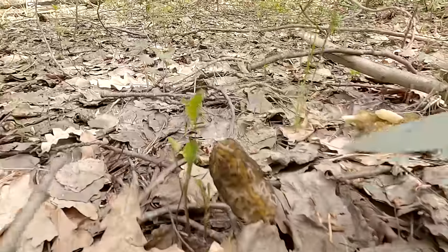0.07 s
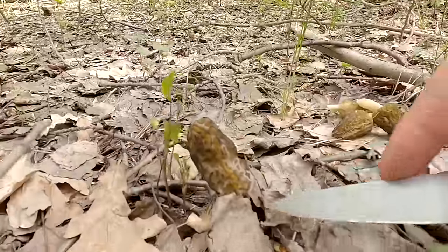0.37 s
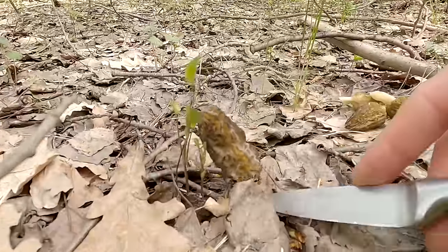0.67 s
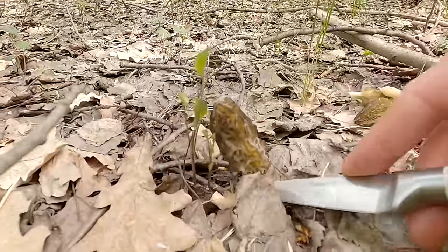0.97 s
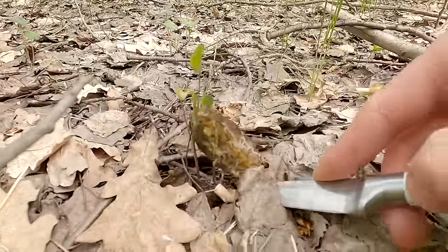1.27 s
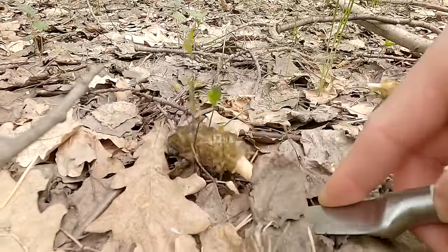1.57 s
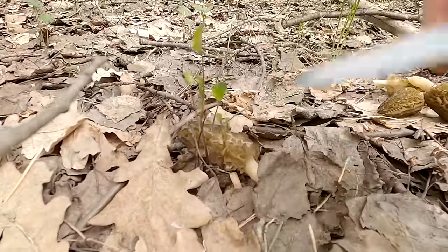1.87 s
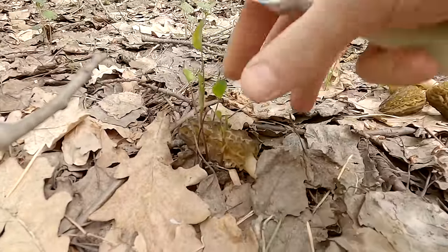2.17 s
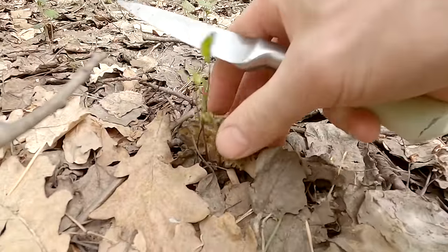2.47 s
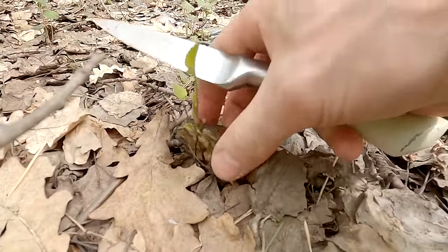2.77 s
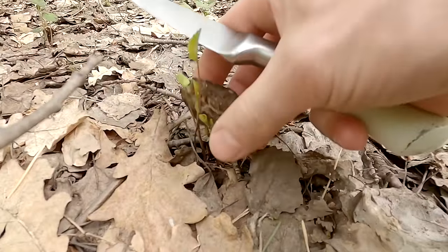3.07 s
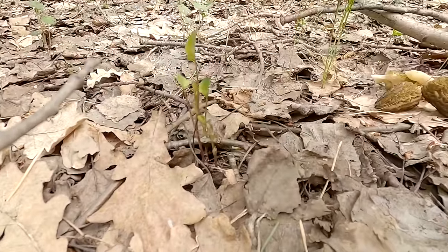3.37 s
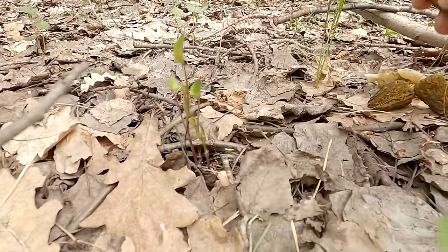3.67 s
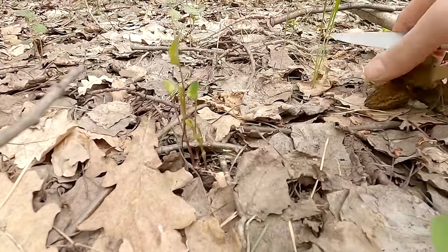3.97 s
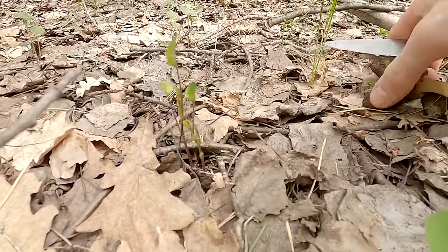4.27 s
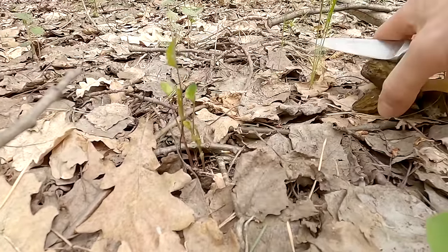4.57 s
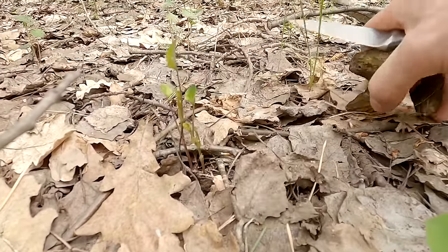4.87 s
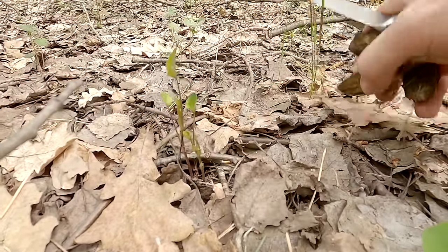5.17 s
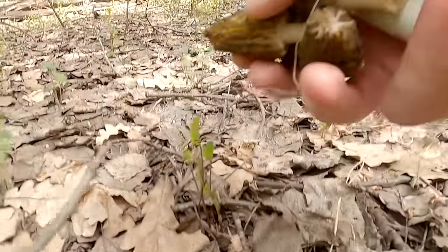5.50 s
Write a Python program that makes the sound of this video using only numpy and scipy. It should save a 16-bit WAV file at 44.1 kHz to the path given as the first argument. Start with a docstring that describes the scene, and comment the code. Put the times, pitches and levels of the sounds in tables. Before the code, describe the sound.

Dry fallen leaves crackle and slide under a hand and knife, close to the microphone. The bursts build to a few sharp cracks, dull knocks and a faint steel ring as the blade cuts through a mushroom stem. After a short lull, lighter rustles and snaps come and go while the hand collects mushrooms, ending in a very brief squeak. Faint handling rumble and a soft forest hush continue throughout.

```python
"""On a forest floor, close by, a hand with a small knife cuts a mushroom out of dry leaves and gathers it.
The leaves rustle as swarms of tiny fractures, with louder single cracks among them. Stem, soil and
mushrooms give dull knocks, and the blade rings faintly as it flicks free. Something squeaks briefly at
the end. Under it all lie the rumble of a hand-held camera and a quiet forest."""
import sys
import numpy as np
from scipy import signal
from scipy.fft import rfft, irfft
from scipy.io import wavfile
from scipy.ndimage import uniform_filter1d

SR = 44100
rng = np.random.default_rng(int(sys.argv[2]) if len(sys.argv) > 2 else 0)


def to_wav(sig):
    """Store sig (one row per channel, or 1-D mono) as 16-bit WAV at the path in sys.argv[1].

    Samples outside -1..1 are clipped; the rate is SR.
    """
    pcm = np.clip(np.atleast_2d(sig), -1, 1) * 32767
    pcm = np.round(pcm).astype(np.int16)
    wavfile.write(sys.argv[1], SR, pcm.T)  # frames by channels


N = 253134
TIME = np.arange(N) / SR
HZ = np.fft.rfftfreq(N, 1 / SR)
TYPICAL_CRACK_HZ, TYPICAL_CRACK_S = 3100, .0013

# The tone colour of dry leaves: pitch_hz, level_db
LEAF_SPECTRUM = [(40, -17.5), (130, -3), (280, -5.5), (420, -6), (900, -2.5), (1900, 0), (3200, 0.5),
                 (4800, -3), (6500, -5), (7900, -10.5), (9000, -7), (10500, -17), (13000, -23),
                 (15500, -36)]


def stirring():
    """Hand and knife push into the leaves: gives level_db, weight_db, crisp_db and sliding over time."""
    # Deep pushes add weight (lows); thin dry edges add crispness (highs):
    # start_s, hold_s, level_db, fall_db_per_s, weight_db, crisp_db, sliding_share
    pushes = [(-0.01, 0.19, -44, 150, 6, -1, .5), (0.194, 0.14, -38, 130, 2.5, -2, 0.37),
              (0.406, 0.074, -41.5, 154.5, 3.5, -4.5, 0.22), (0.581, 0.11, -50, 98, 1, -6, 0.54),
              (0.678, 0.039, -44, 113, 6.5, -4, 0.76), (0.808, .13, -55, 100, 3, -8, 0.15),
              (0.954, 0.12, -49.5, 100, 2.5, 0, .3), (1.061, 0.042, -40.5, 137, 4.5, -3, .3),
              (1.201, 0.098, -43, 244, 3.5, -2, 0.3), (1.34, 0.054, -59.5, 200, 4, -5, 0.3),
              (1.439, 0.091, -42, 296, -1.5, -0.5, 0.33), (1.573, 0.083, -31, 170, 2, 0.5, 0.29),
              (1.779, 0.056, -40.5, 169.5, 4.5, 5, 0.65), (1.892, 0.044, -29.5, 273, 3.5, 1, 0.46),
              (2.033, .02, -59.5, 65, -17, -6, 0.13), (2.484, .03, -48.5, 136, -3, 3, 0.13),
              (2.598, .11, -51, 118, -6, -0.5, 0.24), (2.741, 0.096, -49.5, 120, 3.5, 0.5, 0),
              (2.908, 0.1, -48, 102, 3.5, 3, .15), (3.079, 0.037, -48.5, 105, -1, 4.5, 0.2),
              (3.135, 0.058, -46.5, 550, 6, 0.5, 0.37), (3.225, .03, -62, 50, 5, -16, .35),
              (3.685, 0.15, -67.5, 54, -2, -10, 0.1), (4.112, 0.026, -64, 87, 14, 1, 0.15),
              (4.218, 0.024, -56, 140, 1, 1.5, 0.07), (4.346, 0.14, -54, 217, -0.5, 1.5, 0.23),
              (4.529, 0.13, -54.5, 348, -8, 0.5, .1), (4.711, 0.09, -53.5, 200, -3, 6, 0.2),
              (4.85, 0.12, -51.5, 300, 3.5, 2.5, 0.18), (5.046, 0.055, -54, 182, -5, 7, 0.4),
              (5.168, 0.11, -60, 100, -2, 9, 0.1), (5.329, 0.13, -60, 100, 2, -1, 0.5),
              (5.417, 0.054, -50.5, 102, -1, -1, 0.8), (5.474, .06, -45.5, 90, 5.5, -4.5, 0.92),
              (5.59, 0.093, -53.5, 100, -2, 6.5, 0.56)]
    resting_db = -73
    power, touch = np.full(N, amp(resting_db) ** 2), np.zeros((3, N))
    for start_s, hold_s, level_db, fall_db_per_s, *feel in pushes:
        press = swell(start_s, hold_s, attack_s=0.019, fall_db_per_s=fall_db_per_s)
        # The hand brushes the top leaves on its way in.
        brush = amp(-14 - 172 * abs(TIME - start_s)) * (TIME < start_s + hold_s)
        push_power = amp(level_db) ** 2 * (press ** 2 + brush ** 2)
        power += push_power
        touch += np.outer(feel, push_power)  # the strongest push counts most
    return 10 * np.log10(power), *(touch / power)


def rustle(stir_db, weight_db, crisp_db, sliding, low_hz=850, high_hz=5500):
    """Leaves crackle and slide over each other; the touch sets their weight and crispness."""
    uneven_db = stir_db + wander(25)
    sliding = np.clip(sliding, 0, 1)
    crackle = np.sqrt(1 - sliding) * fracture_swarm()
    slide = np.sqrt(sliding) * noise(LEAF_SPECTRUM)
    both = rfft(crackle + slide)
    lows = 1 / (1 + (HZ / low_hz) ** 4)
    highs = 1 - 1 / (1 + (HZ / high_hz) ** 4)
    bands = ((lows, weight_db), (1 - lows - highs, 0), (highs, crisp_db))
    return sum(amp(uneven_db + lift_db) * irfft(both * band, N) for band, lift_db in bands)


def fracture(ring_hz, ring_share=0.36):
    """One tiny break: a snap, and the short ring of the piece of leaf that it frees."""
    t = np.arange(325) / SR
    snap_s = 0.0003 * rng.uniform(0.45, 1.97)
    snap = rng.standard_normal(len(t)) * np.exp(-t / snap_s)
    ring_cycles = rng.uniform(0.53, 1.47)
    ring = np.sin(2 * np.pi * ring_hz * t) * np.exp(-t * ring_hz / ring_cycles)
    return unit(snap) + ring_share * unit(ring)


def fracture_swarm(per_s=2600, spread_db=3.0, clump_db=2.5, pitches=36):
    """A crackle of steady average level; the breaks come in clumps and a few are much larger."""
    sizes_db = spread_db * rng.exponential(1, N) + clump_db * wander(92)
    sizes = amp(np.minimum(sizes_db, 14))
    clicks = sizes * rng.choice([-1, 1], N) * (rng.random(N) < per_s / SR)
    piece = rng.integers(0, pitches, N)
    swarm = sum(signal.oaconvolve(clicks * (piece == k), fracture(ring_hz))[:N]
                for k, ring_hz in enumerate(np.linspace(600, 12000, pitches)))
    swarm = colour(swarm, LEAF_SPECTRUM)
    power = uniform_filter1d(uniform_filter1d(swarm ** 2, 1300), 650)
    return swarm / np.sqrt(abs(power) + 1e-12)


def leaf_resonances(sound, patchy_db=2.0, patch_hz=650, patch_s=0.039, size=512):
    """Leaf after leaf comes under the fingers, and each favours its own pitches in the rustle."""
    # Bands of the rustle also swell or dip: brief resonances, and slow shifts in treble brightness:
    # middle_s, half_length_s, pitch_hz, width_hz, lift_db
    band_swells = [(0.285, .1, 4340, 700, 3.5), (.35, 0.5, 6500, 1600, -8), (.45, 0.82, 12100, 3020, 4.5),
                   (1.825, 0.032, 2430, 500, 5.5), (1.826, 0.065, 3220, 500, 3.5),
                   (2.66, 0.057, 2560, 500, 7.5), (2.673, 0.08, 5300, 700, 4), (3.156, 0.049, 4250, 800, 6),
                   (4.534, 0.056, 5400, 895, 10.5), (4.7, 0.63, 11200, 2500, -7),
                   (4.9, 0.23, 7000, 2200, 5.5), (5.567, 0.15, 2740, 1100, 6)]
    hz, times, frames = signal.stft(sound, SR, nperseg=size, noverlap=size * 3 // 4)
    pitch_blur = np.exp(-(2 * (hz - hz[size // 4]) / patch_hz) ** 2)
    time_blur = np.exp(-(2 * (times[:size // 4] - times[size // 8]) / patch_s) ** 2)
    blur = np.outer(pitch_blur, time_blur)
    patches = unit(signal.fftconvolve(rng.standard_normal(frames.shape), blur, "same"))
    gain_db = patchy_db * (patches - patches[:size // 8].mean(0))
    for middle_s, half_s, pitch_hz, width_hz, lift_db in band_swells:
        during = np.exp(-((times - middle_s) / half_s) ** 4)
        gain_db += lift_db * during / (1 + (2 * (hz[:, None] - pitch_hz) / width_hz) ** 2)
    return signal.istft(frames * amp(gain_db), SR, nperseg=size, noverlap=size * 3 // 4)[1][:N]


def cracks(rows, ring_octaves=0.4, settle_db=-21, settle_s=.006):
    """Each crack is a quick tear that rings the broken piece, which then settles."""
    out, t = np.zeros(N), np.arange(2048) / SR
    hz = np.geomspace(40, 16000, num=120)
    decades = np.log10(np.maximum(hz, 700) / TYPICAL_CRACK_HZ)
    for start_s, level_db, brightness_hz, time_scale_s, ring_hz in rows:
        rise = 1 - np.exp(-t / (0.4 * time_scale_s))
        tear = rise * np.exp(-(t / (2.15 * time_scale_s)) ** 2)
        settle = amp(settle_db) * np.exp(-t / settle_s)
        tilt_db = 16.8 * np.log(brightness_hz / TYPICAL_CRACK_HZ) * decades  # small pieces are brighter
        peak_db = 10 - np.log2(time_scale_s / TYPICAL_CRACK_S)  # slow tears ring less
        ring_db = peak_db / (1 + (2 * np.log2(hz / ring_hz) / ring_octaves) ** 2)
        shape = np.transpose([hz, spectrum(LEAF_SPECTRUM, hz) + tilt_db + ring_db])
        burst = colour((tear + settle) * rng.standard_normal(len(t)), shape)
        strength = np.sqrt(np.sum(burst ** 2) / (0.0026 * SR))  # as if packed into 2.6 ms
        add(out, start_s, amp(level_db) * burst / strength)
    return out


def loud_cracks():
    """Single leaves and stalks break and stand out from the rustle."""
    # One break a row: start_s, level_db, brightness_hz, time_scale_s, ring_hz
    breaks = [(.2035, -33, 3000, .0012, 3600), (.262, -31.5, 2800, .0013, 2400),
              (.313, -37, 2800, 0.0003, 1400), (.319, -32.5, 3300, 0.0016, 4240),
              (.334, -43, 3300, .0004, 4320), (.3545, -33.5, 2090, 0.00028, 1960),
              (.4917, -40, 2300, 0.00094, 1910), (.5404, -51, 2700, 0.0019, 900),
              (.603, -42, 2700, 0.00072, 2120), (.7005, -40, 3500, 0.00048, 3400),
              (.763, -46, 2700, .0023, 2200), (.9935, -35, 2610, 0.0024, 1180),
              (1.0746, -33.5, 2540, .0002, 1970), (1.0813, -31.5, 3220, 0.001, 2620),
              (1.108, -37, 3100, 0.0013, 4280), (1.222, -38, 1980, .001, 890),
              (1.2347, -39.5, 2100, 0.0021, 1200), (1.3074, -35, 3000, 0.0011, 2650),
              (1.379, -49, 3900, 0.0017, 5140), (1.4536, -39, 7840, 0.00018, 10300),
              (1.5073, -32, 3600, .001, 6000), (1.552, -40, 2800, .0024, 2600),
              (1.5913, -25.5, 4200, 0.0012, 5940), (1.61, -38, 3600, .0035, 3300),
              (1.6494, -30, 3100, 0.003, 885), (1.687, -31.5, 3100, 0.0015, 2800),
              (1.7354, -35.5, 2980, 0.005, 3930), (1.766, -37.5, 4800, 0.0028, 3180),
              (1.9043, -23.5, 2300, 0.0029, 4050), (1.922, -20.5, 3680, 0.0032, 5700),
              (1.9695, -27.5, 3200, 0.00071, 3100), (2.195, -54, 2670, 0.00075, 2200),
              (2.5515, -43, 4700, 0.0021, 4530), (2.5786, -44, 4300, .0021, 10500),
              (2.6547, -37.5, 3500, 0.0041, 5140), (2.7976, -37, 3400, 0.002, 4840),
              (2.839, -37.5, 3200, 0.0029, 2020), (2.8756, -40, 4300, 0.0022, 5160),
              (2.9085, -39.5, 2230, 0.0028, 1210), (2.9363, -33.5, 2980, 0.0039, 1520),
              (2.9993, -38.5, 4200, 0.0011, 10120), (3.0163, -37.5, 2300, 0.0014, 1610),
              (3.0636, -29.5, 4150, 0.0015, 3960), (3.1183, -40.5, 5300, 0.0019, 8860),
              (3.1566, -36, 3300, .0016, 4830), (3.1618, -34, 3870, 0.00058, 4140),
              (3.2616, -49.5, 3920, 0.002, 4300), (3.5523, -53.5, 1600, 0.0023, 1000),
              (3.611, -52, 2400, 0.0011, 2000), (3.711, -49.5, 2100, 0.00061, 1600),
              (3.7835, -44, 3670, 0.0024, 4300), (4.1234, -55, 5300, 0.0013, 8900),
              (4.2492, -44.5, 3900, .0014, 6260), (4.264, -46, 3300, 0.0012, 2080),
              (4.292, -46.5, 2900, 0.0056, 4120), (4.572, -43.5, 3100, 0.0027, 3500),
              (4.6115, -44.5, 3500, .0028, 6700), (4.6552, -44, 3300, .0006, 3400),
              (4.7987, -37.5, 4040, 0.002, 3280), (4.8684, -37.5, 3630, 0.0039, 6060),
              (4.968, -39.5, 3100, 0.0022, 6400), (5.0695, -36, 3100, 0.0026, 1900),
              (5.4612, -37.5, 3300, .0003, 3430), (5.483, -42.5, 2620, 0.00061, 880)]
    return cracks(breaks)


def small_cracks(stir_db, per_s=19, max_db=-40.5, tries=300):
    """Little pieces give way by chance, louder where the leaves are stirred harder."""
    at, chance = rng.integers(0, N, tries), rng.random(tries)
    loudness, brightness, length, ring = np.clip(rng.standard_normal((tries, 4)), -2, 2).T
    level_db = np.minimum(stir_db[at] + 4 + 2.5 * loudness, max_db)
    brightness_hz = TYPICAL_CRACK_HZ * 2 ** (0.6 * brightness)
    time_scale_s = TYPICAL_CRACK_S * 2 ** (0.97 * length)
    ring_hz = TYPICAL_CRACK_HZ * 2 ** (0.8 * ring)
    rows = np.transpose([at / SR, level_db, brightness_hz, time_scale_s, ring_hz])
    return cracks(rows[chance < per_s * N / SR / tries])


def knocks(cycles_to_peak=0.78):
    """Soft, damp things swing only a few times when struck."""
    # Dull knocks into the stem, the soil and the mushrooms: start_s, level_db, pitch_hz
    hits = [(1.223, -34.5, 630), (1.612, -33, 686), (1.628, -35.5, 432), (1.651, -24.5, 526),
            (1.906, -29, 710), (1.922, -41, 115), (1.928, -37, 480), (2.776, -51, 550), (3.158, -45, 375),
            (3.9667, -42.5, 1430), (5.0708, -30, 1580), (5.481, -37.5, 540)]
    out, t = np.zeros(N), np.arange(2048) / SR
    for start_s, level_db, pitch_hz in hits:
        age = t * pitch_hz / cycles_to_peak
        add(out, start_s, amp(level_db) * age * np.exp(1 - age) * np.sin(2 * np.pi * pitch_hz * t))
    return out


def blade():
    """The thin steel rings on after each flick."""
    # The blade flicks free, then is brushed again: start_s, level_db, lift_per_higher_tone_db
    flicks = [(1.925, -37, -13), (2.112, -68, 1)]
    # The blade's own tones: pitch_hz, level_db, ring_s (time to fade by 60 dB)
    tones = [(3994, 0, .23), (4840, 0, .46), (8926, -24, .2)]
    out, t = np.zeros(N), np.arange(SR // 2) / SR
    for start_s, level_db, lift_db in flicks:
        for k, (pitch_hz, tone_db, ring_s) in enumerate(tones):
            fade = amp(level_db + tone_db + k * lift_db - 60 * t / ring_s)
            add(out, start_s, fade * np.sin(2 * np.pi * pitch_hz * t))
    return out


def squeak(level_db=-39.5, jitter=0.034, octave_db=-8):
    """Fast sticking and slipping: a rubbery rasp that briefly catches into a clean, lower tone."""
    # The rasp around the tone: pitch_hz, level_db
    rasp_spectrum = [(1000, -38), (2300, -15), (2700, 1), (3200, -6), (3700, -1), (4050, -8), (4600, -20),
                     (9000, -43)]
    catch = np.exp(-((TIME - 5.6815) / 0.0053) ** 2)
    pitch_hz = 2865 - 100 * catch
    rough = 0.98 * (1 - catch)
    phase = 2 * np.pi * np.cumsum(pitch_hz * (1 + jitter * wander(660))) / SR
    tone = (1 - rough) * unit(np.sin(phase))
    octave = amp(octave_db) * np.sqrt(rough) * unit(np.sin(2 * phase))
    rasp = rough * noise(rasp_spectrum)
    loudness = swell(start_s=5.661, hold_s=0.029, attack_s=.003, fall_db_per_s=600)
    return amp(level_db + 6.5 * catch) * loudness * (tone + octave + rasp)


def forest_echo(sound, scatter_db=-17, scatter_s=0.0014, trunks_db=-31, tail_s=0.26):
    """Fallen leaves scatter each sound for a few milliseconds; trunks send back a faint tail."""
    t = np.arange(SR // 2) / SR
    near = rng.standard_normal(len(t)) * np.exp(-t / scatter_s) * (t > .001)
    far = rng.standard_normal(len(t)) * amp(-60 * t / tail_s) * (t > .015)
    echo = amp(scatter_db) * near / np.linalg.norm(near) + amp(trunks_db) * far / np.linalg.norm(far)
    return sound + signal.fftconvolve(sound, echo)[:N]


def camera_rumble(swell_db=2.5):
    """The unsteady hand that holds the camera makes a low rumble."""
    # How hard the hand shakes: time_s, level_db
    shake = [(0.0, -54.5), (0.46, -51.5), (0.69, -59.5), (0.77, -48), (1.04, -62.5), (1.36, -56),
             (2.67, -62.5), (2.7, -55), (3.61, -68.5), (3.69, -51.5), (3.88, -69), (4.14, -53.5),
             (4.22, -66), (4.32, -53.5), (4.68, -63.5), (4.8, -51.5), (5.48, -58), (5.74, -45.5)]
    # The tone colour of the rumble: pitch_hz, level_db
    rumble_spectrum = [(10, -21), (22, 0), (34, 2), (43, -1), (55, -14.5), (90, -20.5), (200, -31.5),
                       (500, -64)]
    level_db = np.interp(TIME, *np.transpose(shake)) + swell_db * wander(14)
    rumble = noise(rumble_spectrum)
    return amp(level_db) * rumble / np.sqrt(uniform_filter1d(rumble ** 2, 5000))


def forest(level_db=-64.5, swell_db=2.5):
    """The quiet forest is a soft, wavering wash of noise."""
    # The tone colour of the wash: pitch_hz, level_db
    forest_spectrum = [(50, 5), (95, -18), (140, 2), (200, 6), (300, -6.5), (420, -7.5), (700, -19),
                       (1300, -11.5), (3000, -23.5), (6000, -20), (9000, -25.5), (12000, -30.5),
                       (15500, -44)]
    return amp(level_db + swell_db * wander(11)) * noise(forest_spectrum)


def stereo_spread(left):
    """Left and right are nearly alike; the highest fizz is wide and a little louder on the right."""
    # How much of each pitch sounds wide: pitch_hz, level_db
    width_spectrum = [(30, -29), (100, -20.5), (900, -53), (2800, -85), (5000, -23), (9000, -14.5),
                      (10700, -14), (11400, 2), (11900, -1), (16000, -1)]
    # How much louder the right side is: pitch_hz, lift_db
    right_lift = [(11500, 0), (12400, 4), (15500, 3)]
    whole = rfft(left)
    width = np.clip(amp(spectrum(width_spectrum, HZ)), 0, 1)
    scramble = np.exp(3j * wander(500))  # keeps the bursts but shifts their phase at random
    wide = (signal.hilbert(irfft(whole * width, N)) * scramble).real
    right = whole * np.sqrt(1 - width ** 2) + rfft(wide)
    return np.array([left, irfft(right * amp(spectrum(right_lift, HZ)), N)])


def amp(db):
    """Turns decibels into gain."""
    return 10 ** (np.asarray(db) / 20)


def unit(x):
    """Scales a signal to an average power of 1."""
    return x / np.sqrt(np.mean(x ** 2) + 1e-20)


def spectrum(points, hz):
    """Reads the level in dB between (pitch_hz, level_db) points, on a log pitch axis."""
    pitch_hz, level_db = np.transpose(points)
    return np.interp(np.log(hz + 1), np.log(pitch_hz + 1), level_db)


def add(mix, start_s, sound):
    """Mixes a sound in at its start time."""
    part = mix[max(round(start_s * SR), 0):][:len(sound)]
    part += sound[:len(part)]


def colour(x, points, size=2048):
    """Filters to a tone colour without ringing ahead of a hit, so that snaps stay sharp."""
    log_gain = np.log(amp(spectrum(points, abs(np.fft.fftfreq(size, 1 / SR)))))
    taps = np.fft.ifft(np.exp(np.conj(signal.hilbert(log_gain)))).real
    return signal.fftconvolve(x, taps[:size // 2])[:len(x)]


def noise(points):
    """Steady noise with the given tone colour."""
    return unit(irfft(rfft(rng.standard_normal(N)) * amp(spectrum(points, HZ)), N))


def wander(rate_hz):
    """A smooth random wobble, up to about the given rate."""
    return unit(irfft(rfft(rng.standard_normal(N)) * np.exp(-(HZ / rate_hz) ** 2), N))


def swell(start_s, hold_s, attack_s, fall_db_per_s):
    """Gain that rises, holds and dies away."""
    age_s = TIME - start_s
    return np.clip(age_s / attack_s, 0, 1) * amp(-np.clip(fall_db_per_s * (age_s - hold_s), 0, 200))


def scene():
    """Leaves, knife and squeak over the background, all in the middle."""
    stir_db, *touch = stirring()
    leaves = leaf_resonances(rustle(stir_db, *touch)) + loud_cracks()
    background = camera_rumble() + forest()
    picking = leaves + knocks() + blade() + squeak() + small_cracks(stir_db)
    return stereo_spread(background + forest_echo(picking))


def record(dry, cutoff_hz=15600):
    """Cuts off the very highest treble."""
    lowpass = signal.firwin(401, cutoff_hz, window=("kaiser", 9), fs=SR)
    return signal.oaconvolve(dry, lowpass[None], "same")


dry = scene()
out = record(dry)
to_wav(out)
```